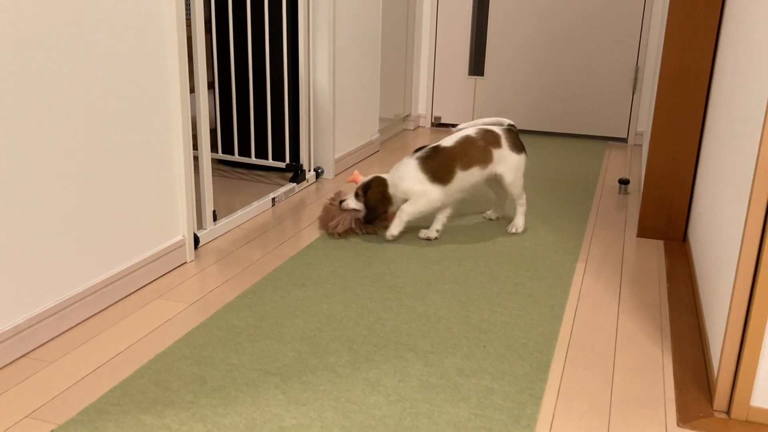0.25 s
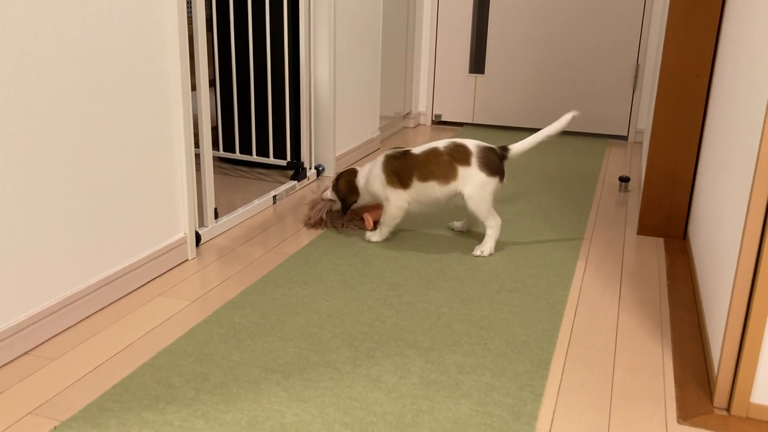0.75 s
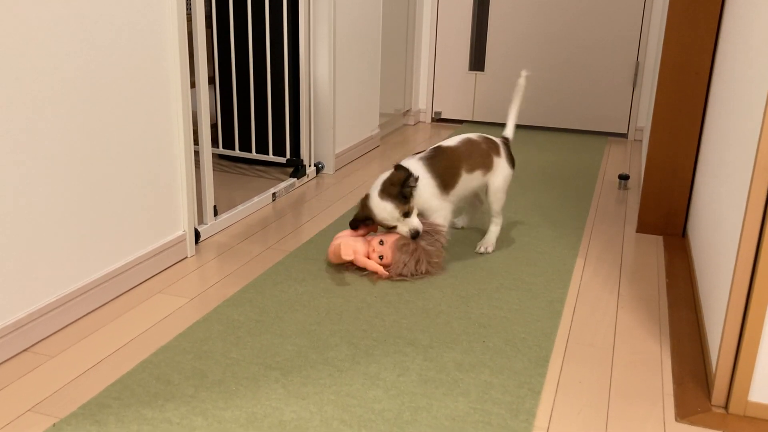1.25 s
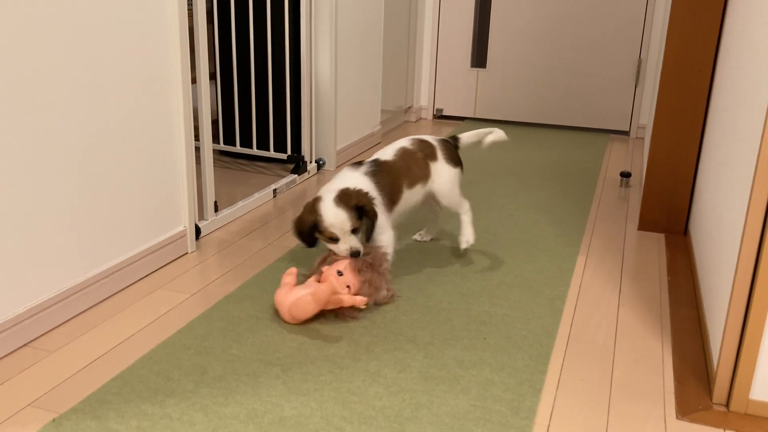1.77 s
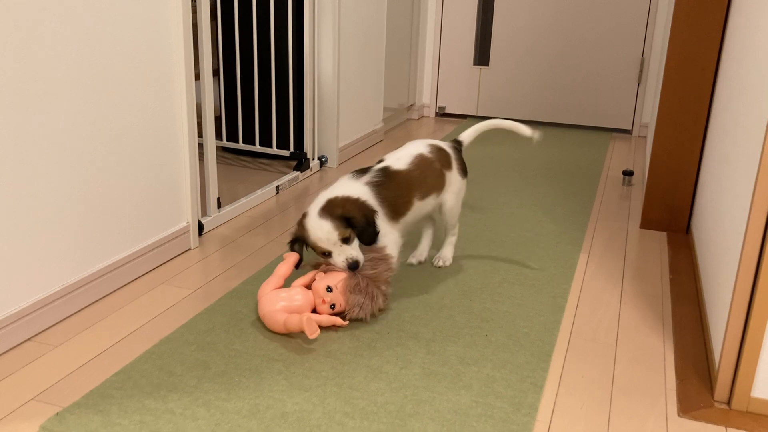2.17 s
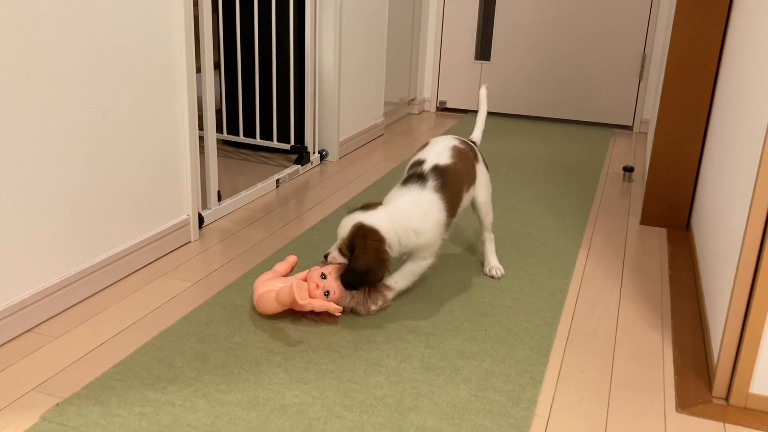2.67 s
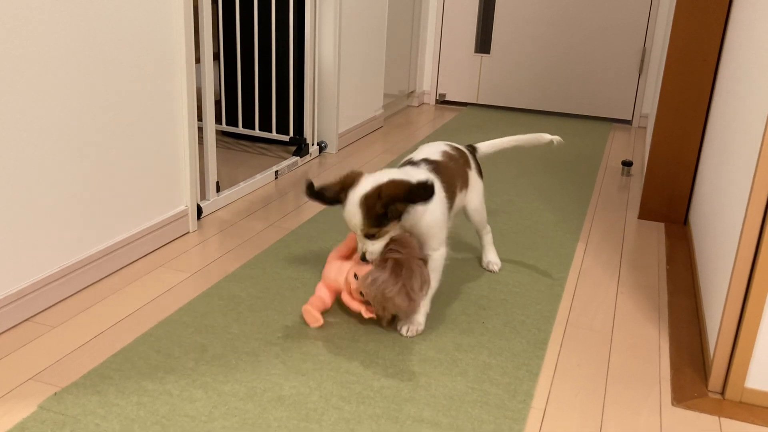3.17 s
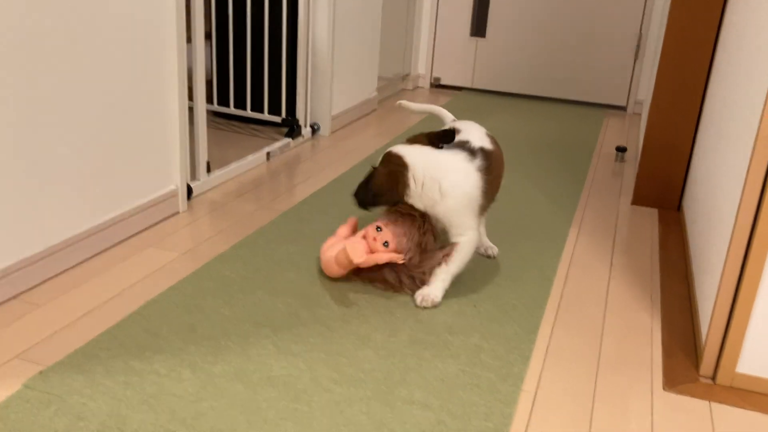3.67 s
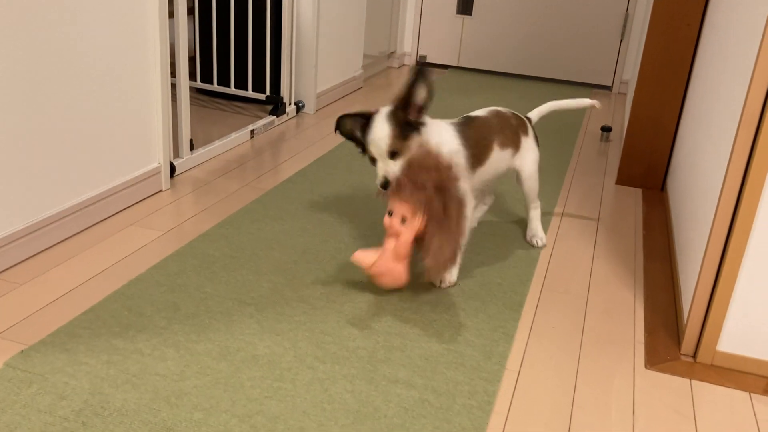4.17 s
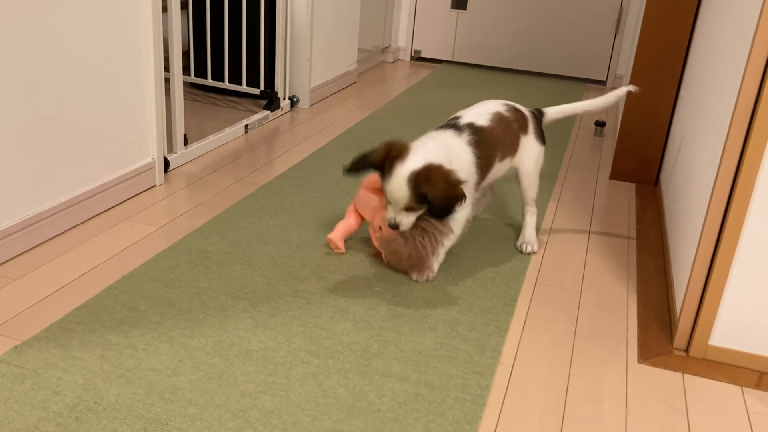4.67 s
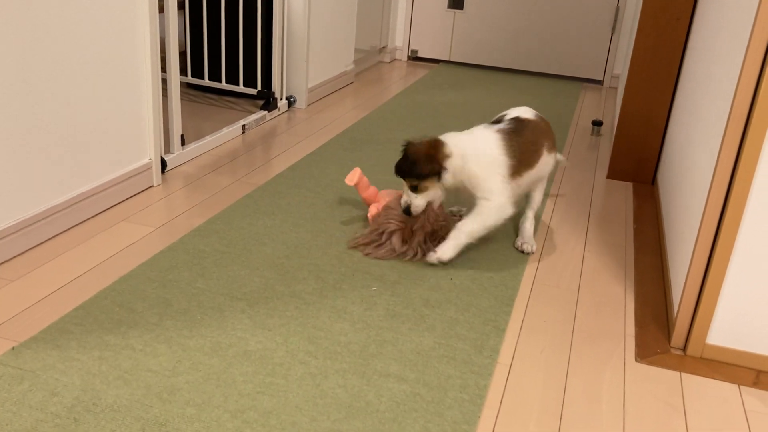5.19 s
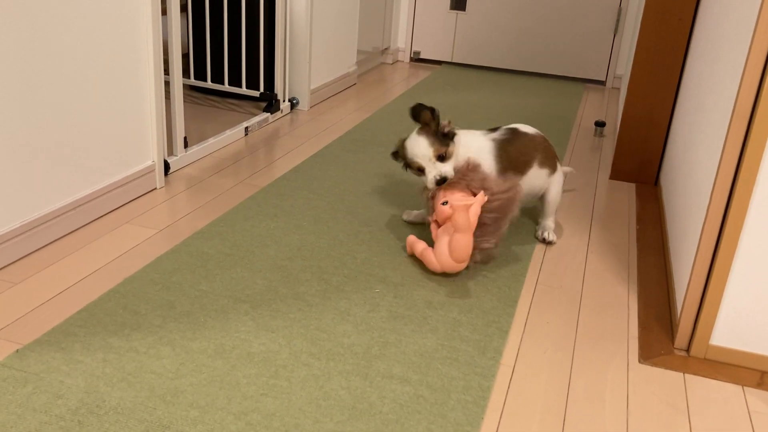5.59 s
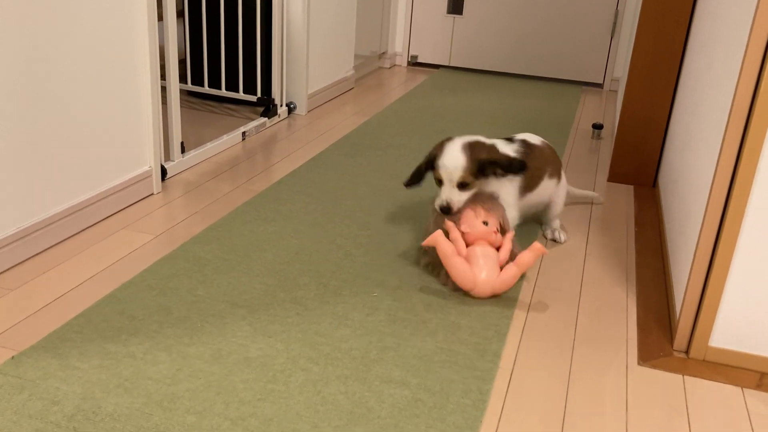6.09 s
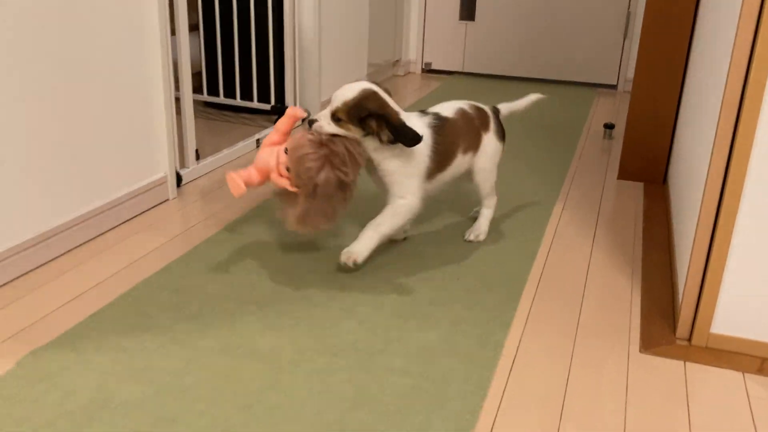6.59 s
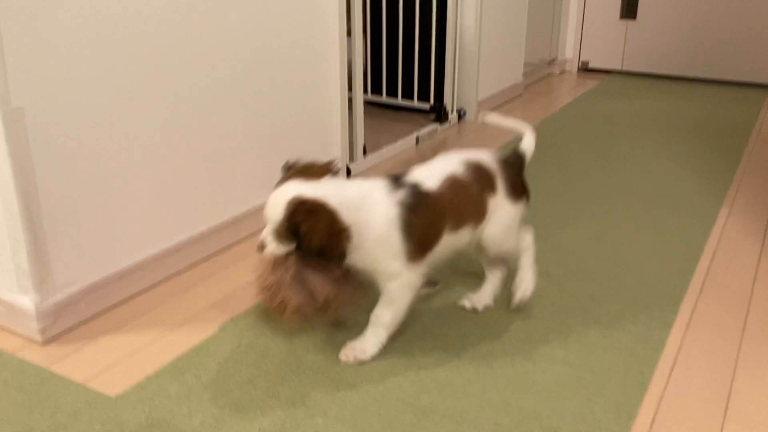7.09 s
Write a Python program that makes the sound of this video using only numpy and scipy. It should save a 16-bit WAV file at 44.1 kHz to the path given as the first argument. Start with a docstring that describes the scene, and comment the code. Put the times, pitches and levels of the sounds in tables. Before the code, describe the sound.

A puppy growls in short, rough bursts while a plastic doll and its paws thump on a carpeted wooden floor.

```python
"""A narrow hallway: a puppy growls in short bursts as it tugs and shakes a soft plastic doll.
The growl is uneven vocal-fold pulses and chopped air, coloured by throat, mouth and bared teeth.
Doll and paws thump on a runner over a wooden floor: the boards flex and ring, the hollow doll knocks
and slaps, and claws and teeth add a few light clicks. Hair and paws swish over the runner, above a
bed of soft hiss and the low murmur of the house."""
import sys
import numpy as np
from scipy import signal
from scipy.fft import rfft, irfft
from scipy.io import wavfile
from scipy.ndimage import uniform_filter1d

SR = 44100
rng = np.random.default_rng(int(sys.argv[2]) if len(sys.argv) > 2 else 0)


def transcribe(u):
    """Save the signal u as a 16-bit wav file named by the first command-line argument.

    u: samples, shape (n,) or (channels, n), limited to [-1, 1]; the rate is SR.
    q: integer samples, one column per channel.
    """
    v = np.clip(np.atleast_2d(u).T, -1, 1)
    q = np.round(v * 32767).astype(np.int16)
    wavfile.write(sys.argv[1], SR, q)


N = 323840
TIME = np.arange(N) / SR

# growl phrases; values hold at mid-length, while glide, swell and mouth change run from start to end:
# (start [s], length [s], pitch [Hz], glide [semitones], roughness [0-1], level [dB], swell [dB],
#  chest over level [dB], mouth over level [dB], mouth change [dB], mouth tuning [ratio])
GROWL_PHRASES = [(0.131, 0.36, 140, 4, 0.71, -49, 10.5, 1.5, -8, -12, 0.99),
                 (0.885, 0.52, 178, 0.67, 0.53, -44.5, -2.5, 1, -16, -5, 0.89),
                 (1.885, 0.37, 155.1, -2.5, .8, -48.5, -5.5, 4.5, -14.5, -16.5, 1.06),
                 (2.859, 0.54, 166.8, 1.5, .68, -47, -1, 3, -22.5, -5.5, 0.948),
                 (3.836, 0.47, 171.6, 1.26, 0.63, -43.5, -1, 2.5, -16.5, 4.5, 0.9),
                 (4.809, 0.074, 170, -1, 0.56, -55.5, 2, 7.5, -13, 9, 0.93),
                 (4.94, 0.043, 145.4, -1, .6, -45, -7, 1.5, -16.5, -3, .97),
                 (5.049, 0.062, 160.9, .5, .65, -52, -3, 6.5, -22, 0, .9),
                 (5.135, 0.15, 173, 1.5, 0.68, -44, -1.5, -0.5, -14.5, 2, 0.946),
                 (5.605, 0.21, 173.9, 2.5, 0.82, -49.5, 4.5, 3.5, -15.5, 9, 0.97),
                 (6.115, 0.0797, 155.4, -2, .55, -44, -2.5, 4.5, -16, 0, .97),
                 (7.027, 0.26, 166, 0.57, 0.48, -53, -7, 12.5, -11.5, 0, 1)]
# snarls, where a growl surges and the jaws part: (time [s], half width [s], push [dB], opening [dB])
SNARL_ACCENTS = [(0.451, 0.051, 1.5, 4), (0.935, 0.049, 1, 4), (1.075, .045, 8.5, 9),
                 (2.93, 0.077, 1.5, 15), (2.985, .045, 11, 2.5), (3.201, 0.031, 5, -1),
                 (3.365, 0.057, 5, 18), (4.0, 0.069, 1.5, 6), (4.18, .035, 9, 7.5), (5.227, 0.061, 1, 6),
                 (5.275, 0.016, 6, 1.5), (5.775, .045, 3.5, 3.5), (7.072, 0.0222, 3.5, 8),
                 (7.18, .025, 7, -2.5)]
# brief breaks in the voice: (time [s], dip [dB])
VOICE_CATCHES = [(0.285, -2), (1.19, -6.5), (3.09, -4.5), (4.08, -2), (7.145, -4), (7.26, -7)]
# resonances of throat, open mouth and bared teeth: (frequency [Hz], width [Hz], level [dB])
THROAT_FORMANTS = [(303.6, 64, 3), (397.4, 38, -0.5), (484, 93, 2)]
MOUTH_FORMANTS = [(1030, 110, 0), (1340, 190, 0), (1800, 450, -9)]
TEETH_FORMANTS = [(2180, 270, -9), (3860, 430, -13.5)]
# doll and paws landing on the floor: (time [s], thump level [dB], knock level [dB], slap level [dB])
LANDINGS = [(0.565, -24, -54, -59), (1.206, -23, -49.5, -68), (1.357, -30.5, -61, -73),
            (1.696, -39, -104, -67), (1.818, -14.5, -38.5, -48), (3.269, -21, -68, -60),
            (3.745, -16, -42, -55), (4.237, -23, -65, -73), (4.333, -32, -57.5, -61.5),
            (4.526, -15.5, -58, -55.5), (4.755, -20, -40.5, -45.5), (4.958, -27.5, -72, -72),
            (5.491, -23.5, -59, -57.5), (5.713, -29.5, -61, -63), (6.942, -19, -65, -52.5)]
# light steps on the runner: (time [s], level [dB])
PAW_STEPS = [(0.205, -38.5), (2.583, -47.5), (2.819, -44), (3.099, -34), (5.33, -43.5), (5.65, -29.5),
             (6.369, -46), (6.418, -40), (6.48, -51), (6.82, -45.5), (7.109, -31), (7.299, -38.5)]
# ring of the floorboards and of the hollow doll: (frequency [Hz], level [dB], t60 [s])
BOARD_MODES = [(68, -25, .35), (98, -17, .31), (122, -25, .2)]
DOLL_MODES = [(216, 14, 0.045), (325.6, 11, 0.066), (376, 7, 0.056), (508.7, -56, 0.056), (800, -10, 0.02),
              (1220, -11.5, 0.013), (1414, -32, 0.11)]
# claws and teeth clicking: (time [s], level [dB], centre [Hz])
CLICK_HITS = [(1.111, -58, 2516), (1.371, -55.5, 1770), (3.515, -64, 3980), (4.482, -57, 2007),
              (5.273, -54, 3518), (5.409, -54, 6500), (5.641, -61.5, 1488), (6.036, -60, 3310),
              (6.055, -58.5, 3263), (6.151, -54, 2906), (6.21, -50, 4100), (6.225, -61, 5530),
              (7.159, -50, 1202), (7.2, -55, 980)]
# hair and paws dragged over the runner: (time [s], half width [s], level [dB])
RUNNER_SWISHES = [(0.36, 0.15, -61.5), (1.25, 0.067, -58.5), (1.49, 0.079, -58.5), (1.88, 0.18, -61.5),
                  (2.345, 0.047, -64), (2.54, 0.048, -62.5), (2.93, 0.089, -62.5), (3.41, .05, -64),
                  (3.52, .02, -60.5), (3.85, 0.079, -58.5), (4.029, 0.041, -58.5), (4.36, .05, -72),
                  (4.535, 0.022, -61.5), (4.78, 0.04, -61), (4.949, 0.067, -59.5), (5.26, 0.063, -63.5),
                  (5.461, 0.058, -60.5), (5.785, 0.05, -59), (5.97, .07, -63.5), (6.25, .08, -62.5),
                  (6.59, 0.049, -62), (6.851, 0.024, -64.5), (6.96, 0.026, -64), (7.11, .08, -60.5)]
# slow rise and fall of the hiss bed, the steady rustle of play on the runner: (time [s], level [dB])
HISS_BED_LEVEL = [(0, -58), (1.05, -60.5), (1.65, -64.5), (2.25, -65.5), (3.2, -64), (3.7, -60), (4.25, -64),
                  (5.1, -66), (6.1, -65.5), (6.45, -69.5), (6.8, -71), (7.05, -58), (7.34, -62.5)]
# noise colours of the doll's slap, the hiss and the house murmur: (frequency [Hz], density [dB])
SLAP_SPECTRUM = [(500, 14), (1300, 20.5), (2200, 11.5), (4200, 18.5), (5800, 2), (8000, 12.5), (16000, -13)]
HISS_SPECTRUM = [(150, -37), (400, -1), (1000, 0), (2000, 1), (4000, 0.5), (5600, -1), (7000, -0.5),
                 (11500, 3.5), (15500, -4)]
MURMUR_SPECTRUM = [(25, -9), (50, -6), (80, 11.5), (130, -4), (210, 5.5), (330, -1.5), (520, -4.5),
                   (800, -12.5), (2000, -24), (8000, -68)]
# reverb decay of the hallway: (frequency [Hz], t60 [s])
HALL_DECAY = [(80, 0.58), (200, 0.5), (500, 0.21), (1500, 0.38), (5000, 0.27), (15000, 0.017)]
# how alike the two microphones sound: (frequency [Hz], likeness [0-1])
MIC_LIKENESS = [(60, .85), (130, .85), (250, .72), (500, .45), (800, .2), (1100, .35), (2000, .15),
                (5000, .2), (6200, .35), (6900, .87), (15000, .87)]
# how far the left microphone leads: (frequency [Hz], phase [rad])
LEFT_LEAD = [(0, 0), (600, .4), (1000, -.4), (1700, -.4), (3000, 2.2), (4400, 0), (5400, 2.8), (7000, 0),
             (16000, -13)]


def growl(jitter=.11, shimmer_db=6, flap_hz=90, teeth_db=-14, teeth_growth=.1, snarl_mouth_db=-53.5):
    """Uneven vocal-fold pulses and the air they chop: a chest tone, and a voice shaped by formants."""
    pitch, rough, mouth_tuning, chest_gain, throat_gain, mouth_gain = effort()
    cycles = np.cumsum(pitch * (1 + jitter * rough * drift(70))) / SR
    # loose tissue flaps, so some cycles hit much harder than others
    flap = from_db(shimmer_db * rough * drift(flap_hz))
    pulses = rms_one(np.diff(np.floor(cycles), prepend=0))
    swing = np.cos(2 * np.pi * cycles)
    air = rough * rms_one(rng.standard_normal(N) * (1 + swing) ** 2)
    rasp = (pulses + air) * flap
    chest = evened(cut(swing * flap, 76, "high", order=3))
    throat = evened(cut(resonate(rasp, THROAT_FORMANTS), [215, 610], "band", order=4))
    mouth = evened(cut(sweep_formants(rasp, MOUTH_FORMANTS, mouth_tuning), [830, 2600], "band", order=3))
    teeth = evened(cut(resonate(air * flap, TEETH_FORMANTS), [1500, 5000], "band"))
    # the wider the mouth, the more air rasps past the teeth
    teeth_gain = from_db(teeth_db) * (mouth_gain / from_db(snarl_mouth_db)) ** teeth_growth
    return chest * chest_gain, throat * throat_gain + (mouth + teeth * teeth_gain) * mouth_gain


def effort(attack_s=.039, release_s=.029, waver_hz=14, waver_db=1.24, waver_semitones=.4):
    """The puppy's performance: each growl starts, glides and stops; snarls push it and open the mouth."""
    current = np.maximum(np.searchsorted([row[0] for row in GROWL_PHRASES], TIME) - 1, 0)
    phrase = np.array(GROWL_PHRASES)[current].T
    start, length, hz, glide, rough, db, swell_db, chest_db, mouth_db, mouth_change_db, tuning = phrase
    age = TIME - start
    gate = np.clip(np.minimum(age / attack_s, 1 - (age - length) / release_s), 0, 1)
    along = np.clip(age / length, 0, 1) - .5
    push_db, open_db = 0, mouth_change_db * along
    for peak_s, half_width_s, snarl_db, jaw_db in SNARL_ACCENTS:
        snarl = bump(peak_s, half_width_s)
        push_db += snarl_db * snarl
        open_db += jaw_db * snarl
    waver = drift(waver_hz)
    # a push raises the pitch and cleans up the grit; the formants rise as the mouth opens
    pitch = hz * 2 ** ((glide * along + .4146 * push_db + waver_semitones * waver) / 12)
    rough = np.clip(rough * np.exp(-.09 * push_db), 0, 1)
    mouth_tuning = tuning * np.exp(.008 * open_db)
    catch_db = sum(dip_db * bump(s, half_width_s=.016) for s, dip_db in VOICE_CATCHES)
    gain = gate * from_db(db + swell_db * along + catch_db + waver_db * waver)
    chest_gain = gain * from_db(chest_db + push_db)
    throat_gain = gain * from_db(.31 * push_db)  # only a share of the push
    mouth_gain = throat_gain * from_db(mouth_db + open_db)
    return pitch, rough, mouth_tuning, chest_gain, throat_gain, mouth_gain


def floor_thumps(start_hz=275, end_hz=64, glide_s=.011, hard_rise_s=.01, echo_s=.052, echo_db=-15):
    """The floor flexes: fast bending waves arrive first, so each thump drops in pitch; the boards ring."""
    out, t = np.zeros(N), np.arange(SR // 2) / SR
    cycles = end_hz * t + (start_hz - end_hz) * glide_s * (1 - np.exp(-t / glide_s))
    # a landing with little knock is a soft one, with a slower attack
    blows = [(s, db + .5, hard_rise_s * from_db(.15 * (db - knock_db - 12)))
             for s, db, knock_db, _ in LANDINGS]
    blows += [(s, db - 2, 2 * hard_rise_s) for s, db in PAW_STEPS]
    for s, db, rise_s in blows:
        flex = (t / rise_s * np.exp(1 - t / rise_s)) ** 3 * np.sin(2 * np.pi * cycles)
        boards = ring(BOARD_MODES, t) * (1 - np.exp(-t / (2 * rise_s)))
        add(out, s, from_db(db) * (flex + boards))
    end_wall_echo = from_db(echo_db) * np.interp(TIME - echo_s, TIME, out)
    return out + end_wall_echo


def doll_hits(knock_trim_db=1, slap_trim_db=3, slap_t60=.055, squash_s=.00479):
    """The doll's skin slaps as it lands, then its hollow body knocks."""
    out, t = np.zeros(N), np.arange(SR // 4) / SR
    for s, _, knock_db, slap_db in LANDINGS:
        add(out, s, from_db(slap_db + slap_trim_db - 60 * t / slap_t60) * noise(SLAP_SPECTRUM, len(t)))
        add(out, s + squash_s, from_db(knock_db + knock_trim_db) * ring(DOLL_MODES, t))
    return out


def clicks(trim_db=3, t60=.033):
    """Claws and teeth tick: short noise bursts, each about an octave wide."""
    out, t = np.zeros(N), np.arange(SR // 8) / SR
    for s, db, hz in CLICK_HITS:
        tick = noise([(hz / 10, -40), (hz / 2, -10), (hz, 0), (2 * hz, -10), (10 * hz, -40)], len(t))
        add(out, s, from_db(db + trim_db - 60 * t / t60) * tick)
    return out


def swishes_and_hiss(trim_db=5, flutter_db=1.06):
    """A bright, fluttering hiss that swells as hair and paws drag over the runner."""
    bed_db = np.interp(TIME, *np.transpose(HISS_BED_LEVEL))
    swish_power = sum(from_db(db) ** 2 * bump(s, half_width_s, lean=1.16)
                      for s, half_width_s, db in RUNNER_SWISHES)
    gain = np.sqrt(from_db(bed_db) ** 2 + swish_power) * from_db(trim_db + flutter_db * drift(18))
    return gain * two_mics(noise(HISS_SPECTRUM), noise(HISS_SPECTRUM))


def house_murmur(level_db=-58.5, waver_db=3):
    """Room tone: the low, wavering noise of the house."""
    gain = from_db(level_db + waver_db * drift(13.3))
    return gain * two_mics(noise(MURMUR_SPECTRUM), noise(MURMUR_SPECTRUM))


def hallway(x, wet_db, positions=9):
    """Direct sound plus reverb, crossfading between reflection patterns as the puppy moves about."""
    wet = np.zeros((2, N))
    hop = N // (positions - 1) + 1
    for centre in range(0, positions * hop, hop):
        span = np.arange(max(centre - hop, 0), min(centre + hop, N))
        faded = x[span] * (1 - np.abs(span - centre) / hop)
        for channel, tail in zip(wet, reflections()):
            add(channel, span[0] / SR, signal.fftconvolve(faded, tail))
    return x + from_db(wet_db) * wet


def reflections(predelay_s=.0055):
    """A dense stereo tail of unit energy that dies sooner in the treble."""
    t = np.arange(SR // 3) / SR
    edges = np.geomspace(40, 16000, 10)
    tails = 0
    for low, high in zip(edges, edges[1:]):
        band = cut(rng.standard_normal((2, len(t))), [low, high], "band")
        tails += band * from_db(-60 * t / at_hz(HALL_DECAY, np.sqrt(low * high)))
    return two_mics(*(rms_one(tails * (t > predelay_s)) / np.sqrt(len(t))))


def two_mics(common, other):
    """Stereo width: two unrelated signals become a partly alike, phase-shifted pair."""
    hz = np.fft.rfftfreq(len(common), 1 / SR)
    alike = at_hz(MIC_LIKENESS, hz)
    mid = rfft(common) * np.sqrt((1 + alike) / 2)
    side = rfft(other) * np.sqrt((1 - alike) / 2)
    right_lag = np.exp(-1j * np.interp(hz, *np.transpose(LEFT_LEAD)))
    return irfft([mid + side, (mid - side) * right_lag], len(common))


def resonate(x, formants):
    """Parallel resonances of alternating sign, so that neighbours join without a gap."""
    return sum((-1) ** k * from_db(db) * signal.lfilter(*signal.iirpeak(hz, hz / width_hz, fs=SR), x)
               for k, (hz, width_hz, db) in enumerate(formants))


def sweep_formants(x, formants, ratio):
    """Move resonances by a ratio: filter on a stretched clock, then go back."""
    clock = np.cumsum(ratio)
    ticks = np.arange(int(clock[-1]))
    return np.interp(clock, ticks, resonate(np.interp(ticks, clock, x), formants))


def ring(modes, t):
    """Struck modes dying away."""
    return sum(from_db(db - 60 * t / t60) * np.sin(2 * np.pi * hz * t) for hz, db, t60 in modes)


def noise(spectrum, size=N):
    """Coloured noise of rms 1."""
    colour = from_db(at_hz(spectrum, np.fft.rfftfreq(size, 1 / SR)))
    return rms_one(irfft(rfft(rng.standard_normal(size)) * colour, size))


def drift(rate_hz):
    """Smooth random modulation of rms 1."""
    return rms_one(cut(rng.standard_normal(N + SR), rate_hz, "low")[SR:])


def bump(s, half_width_s, lean=1):
    """A smooth rise to 1 at time s, and a fall that is longer by the ratio lean."""
    width_s = half_width_s * np.where(TIME < s, lean ** -.5, lean ** .5)
    return np.exp(-np.minimum(np.abs(TIME - s) / width_s, 6) ** 2)


def evened(x, window_s=.025):
    """A leveller that holds the running rms at 1."""
    return x / np.sqrt(np.abs(uniform_filter1d(x ** 2, int(window_s * SR))) + 1e-12)


def cut(x, hz, kind, order=2):
    """Butterworth filter."""
    return signal.sosfilt(signal.butter(order, hz, kind, fs=SR, output="sos"), x + 1e-18)


def at_hz(points, hz):
    """A curve read on a log-frequency axis."""
    known_hz, values = np.transpose(points)
    return np.interp(np.log(hz + 1e-9), np.log(known_hz), values)


def add(track, s, sound):
    """Lay a sound into a track at time s."""
    start = int(s * SR)
    track[start:start + len(sound)] += sound[:N - start]


def from_db(db):
    return 10 ** (np.asarray(db) / 20)


def rms_one(x):
    return x / np.sqrt(np.mean(x ** 2) + 1e-20)


def scene(left_db=1.7):
    """The mix: puppy and doll play down the hallway, a little to the left, over hiss and room tone."""
    chest, voice = growl()
    play = hallway(chest, wet_db=-11) + hallway(floor_thumps(), wet_db=-17)
    play += hallway(voice, wet_db=-2) + hallway(doll_hits() + clicks(), wet_db=-4)
    pan = from_db([[left_db / 2], [-left_db / 2]])
    return play * pan + swishes_and_hiss() + house_murmur()


def record(dry, low_cut_hz=36, high_cut_hz=15900):
    """Master EQ: roll off the deep bass and cut the very top steeply."""
    high_cut = signal.ellip(10, .1, 70, high_cut_hz, fs=SR, output="sos")
    return signal.sosfilt(high_cut, cut(dry, low_cut_hz, "high", order=3))


dry = scene()
out = record(dry)
transcribe(out)
```